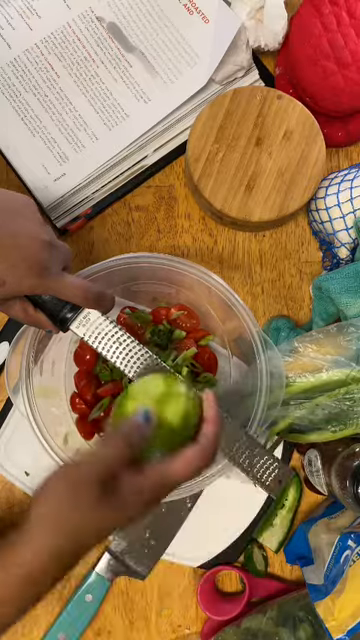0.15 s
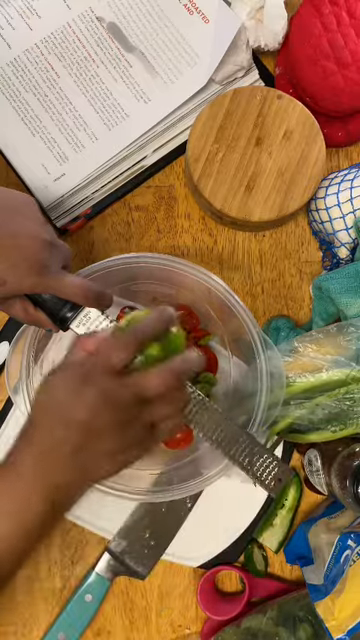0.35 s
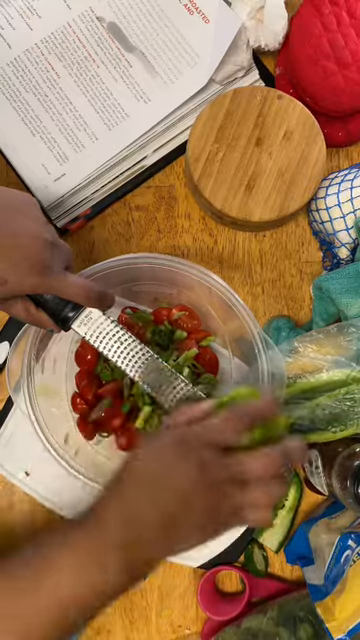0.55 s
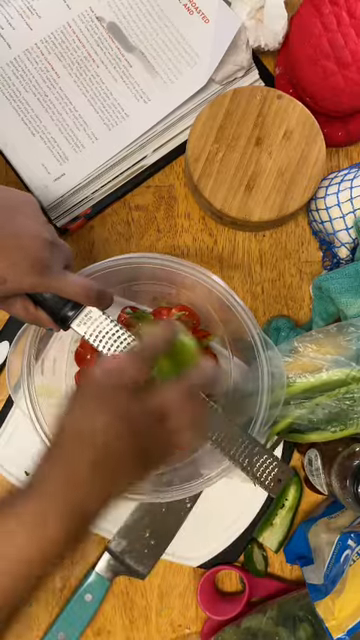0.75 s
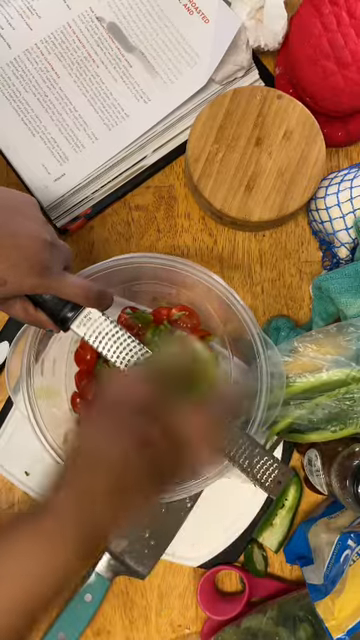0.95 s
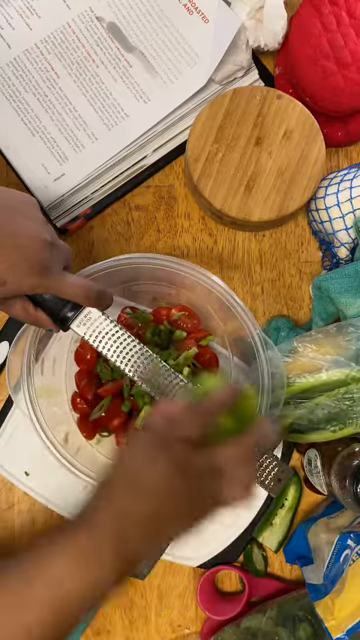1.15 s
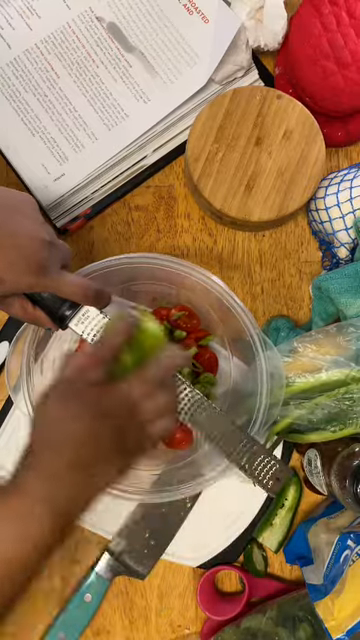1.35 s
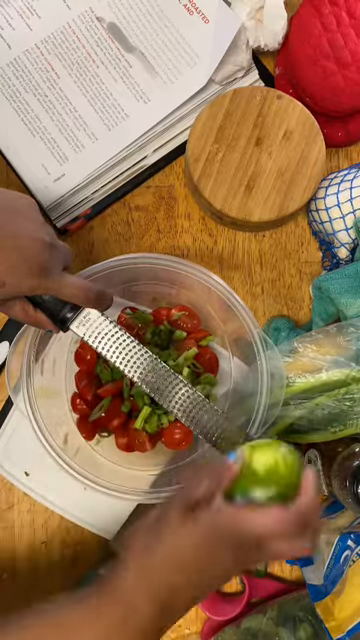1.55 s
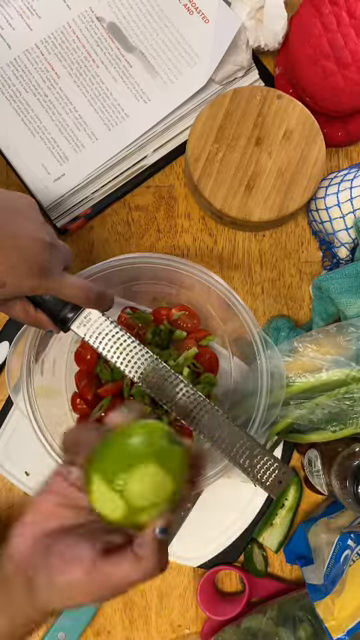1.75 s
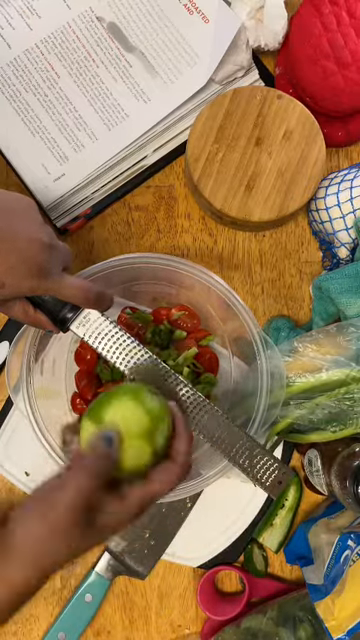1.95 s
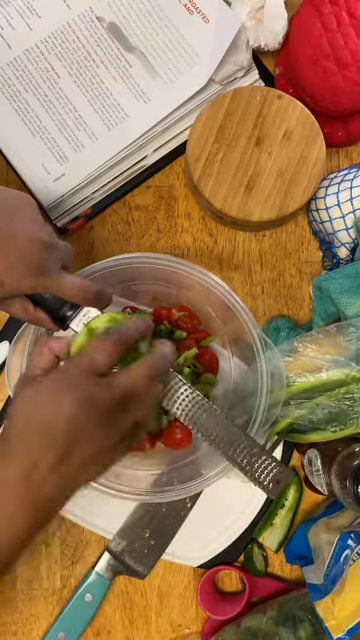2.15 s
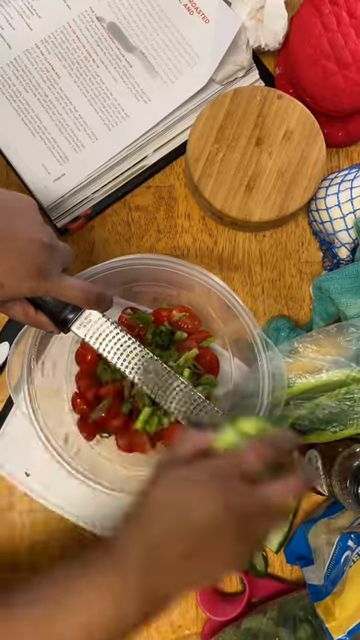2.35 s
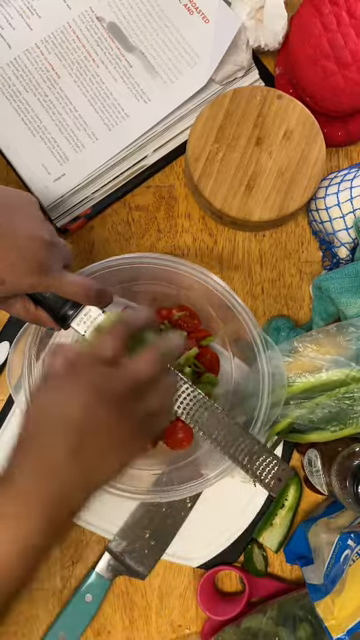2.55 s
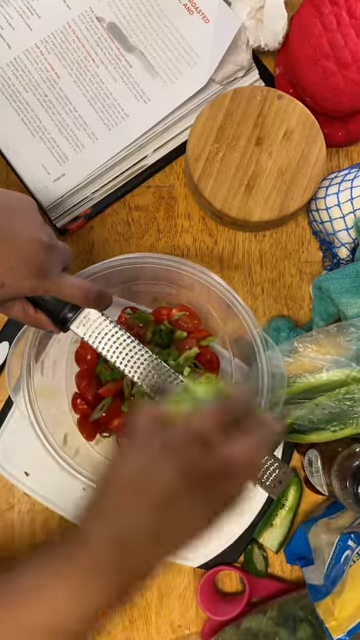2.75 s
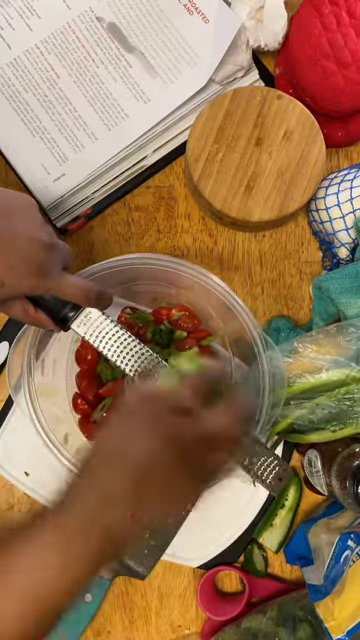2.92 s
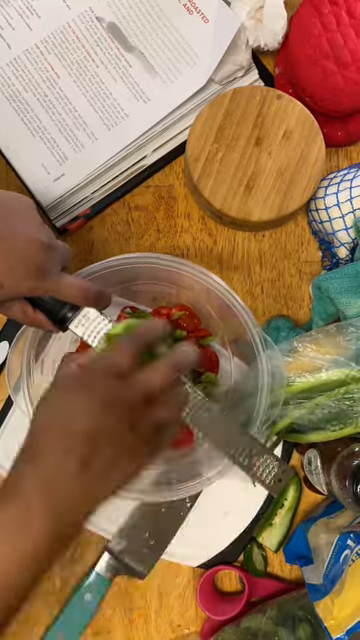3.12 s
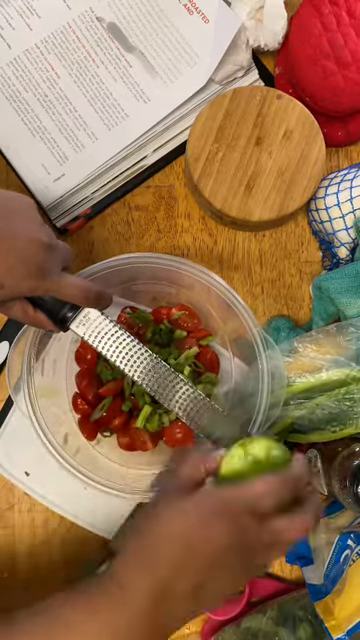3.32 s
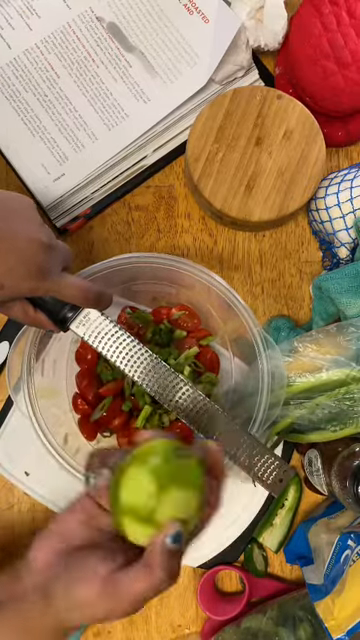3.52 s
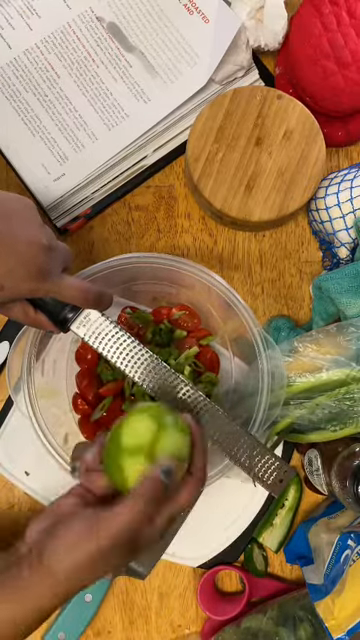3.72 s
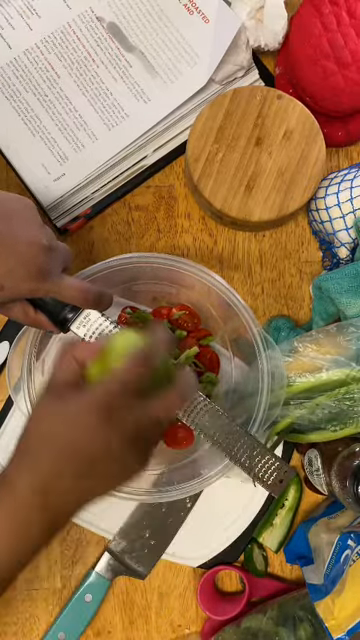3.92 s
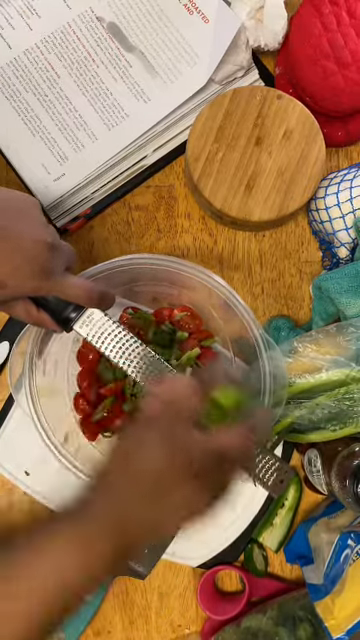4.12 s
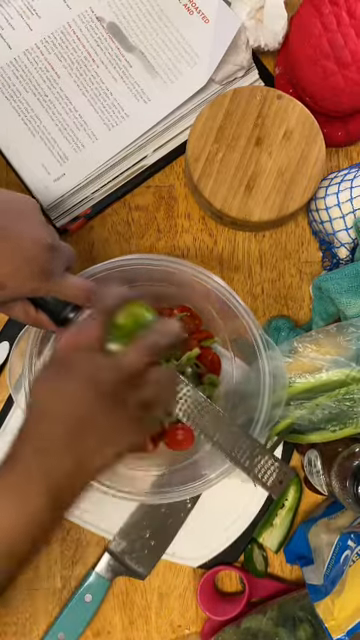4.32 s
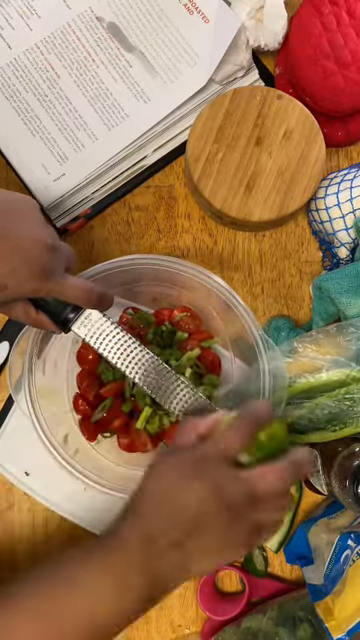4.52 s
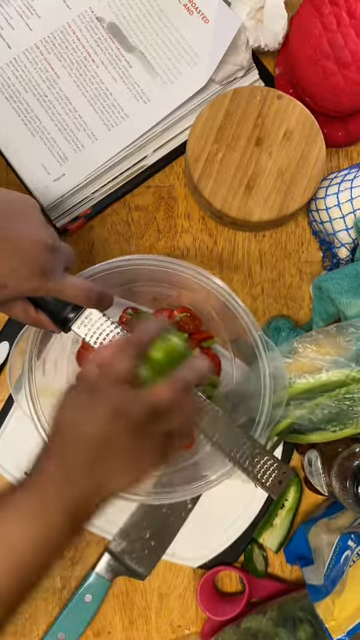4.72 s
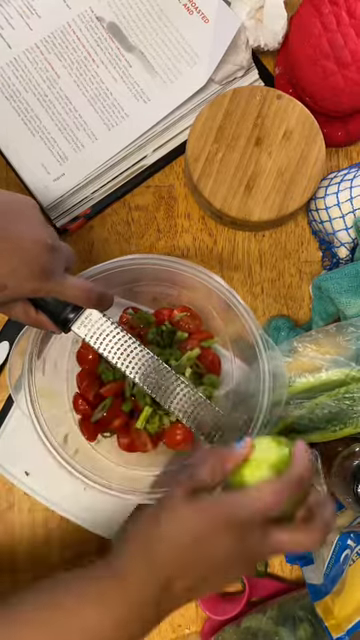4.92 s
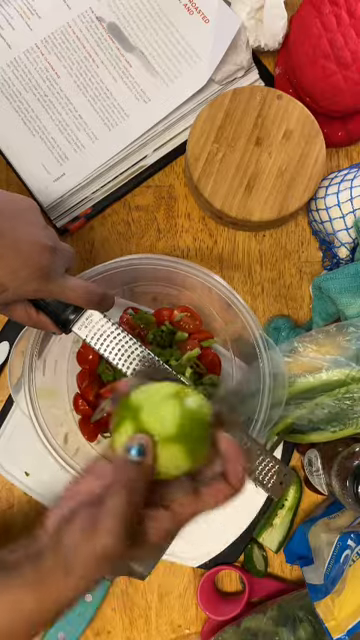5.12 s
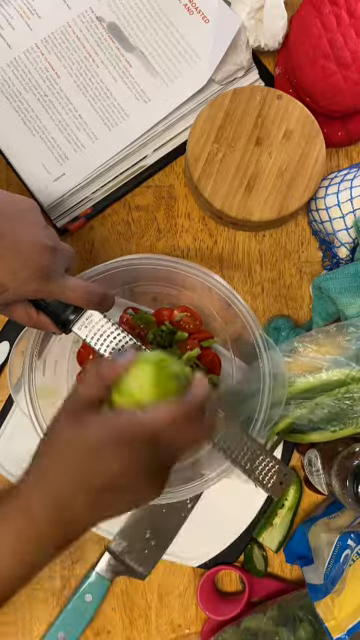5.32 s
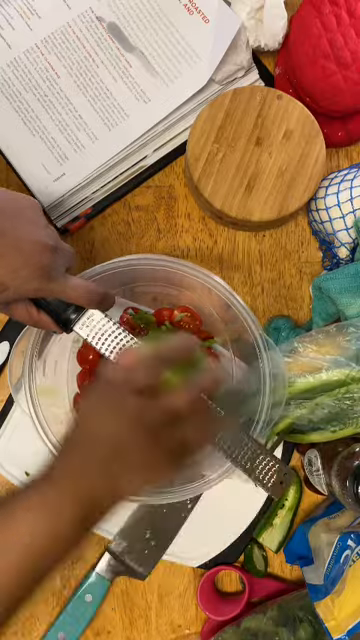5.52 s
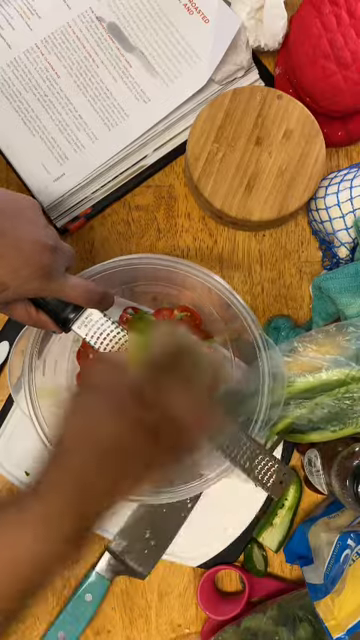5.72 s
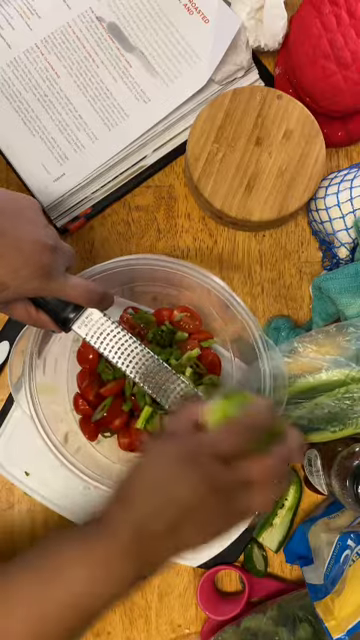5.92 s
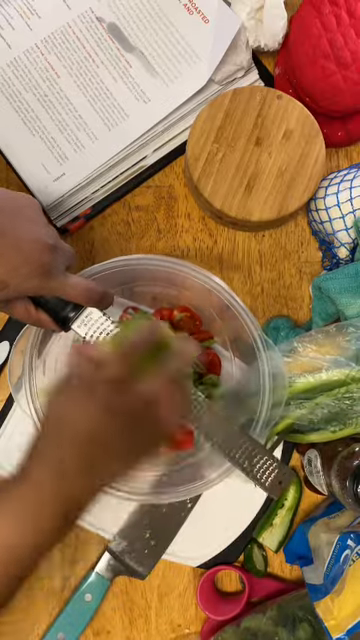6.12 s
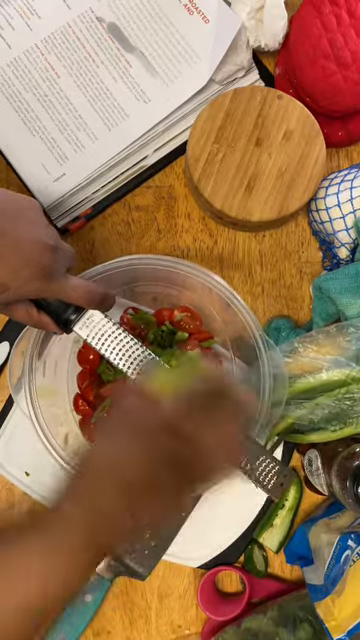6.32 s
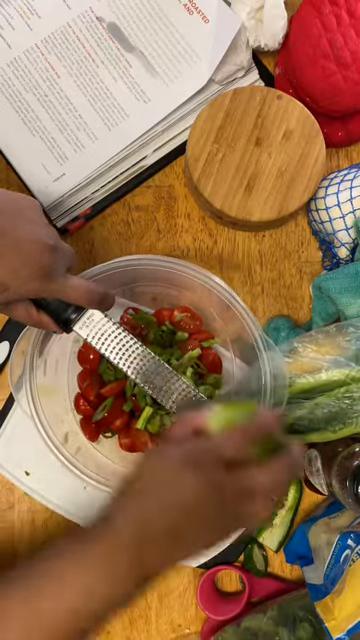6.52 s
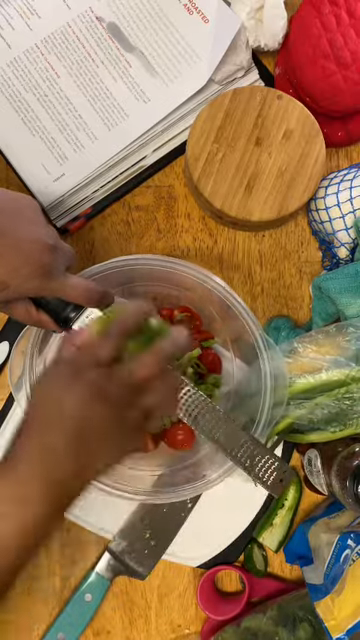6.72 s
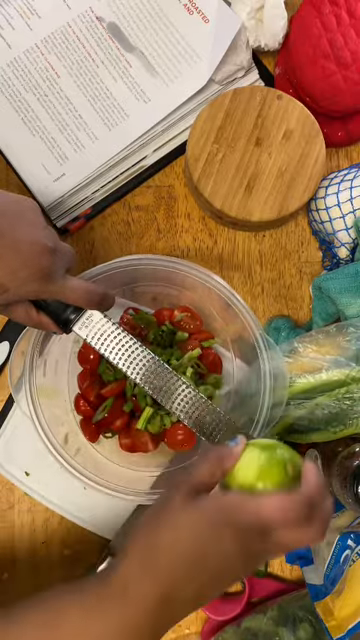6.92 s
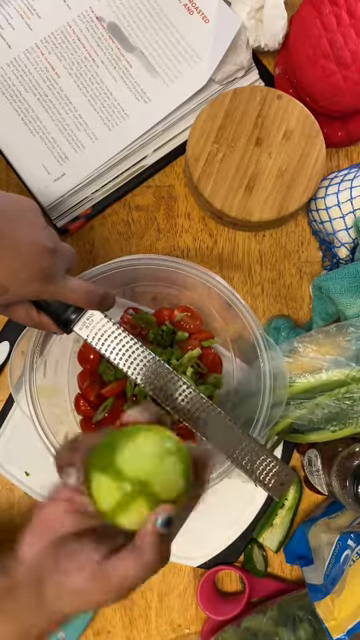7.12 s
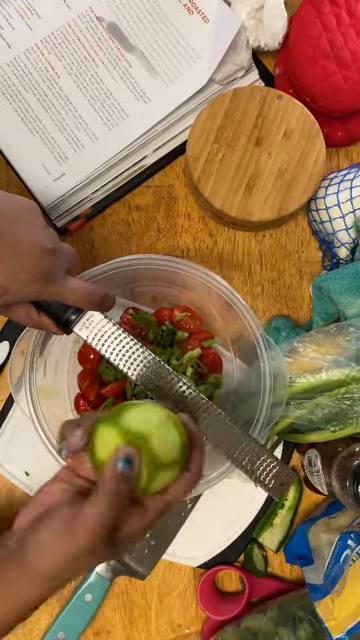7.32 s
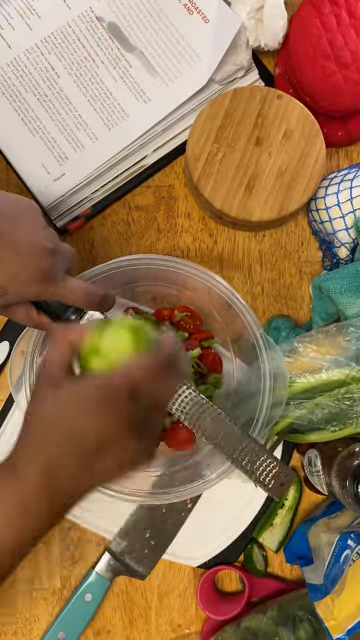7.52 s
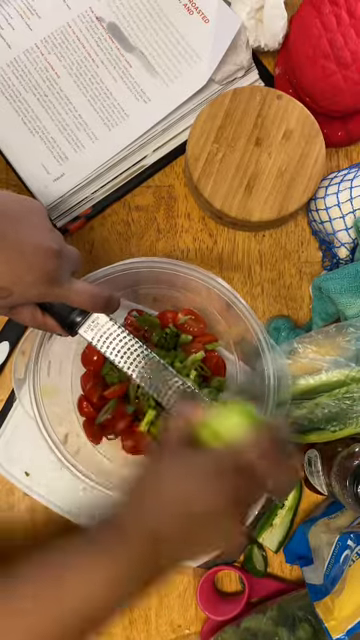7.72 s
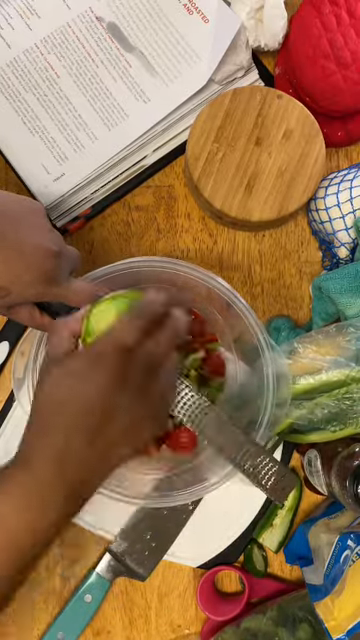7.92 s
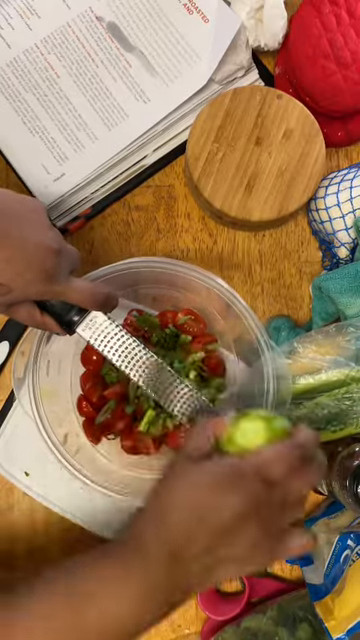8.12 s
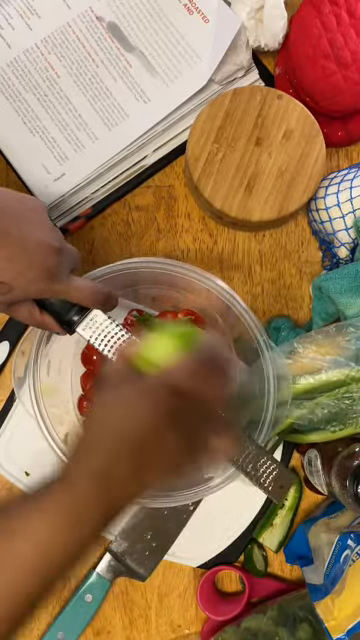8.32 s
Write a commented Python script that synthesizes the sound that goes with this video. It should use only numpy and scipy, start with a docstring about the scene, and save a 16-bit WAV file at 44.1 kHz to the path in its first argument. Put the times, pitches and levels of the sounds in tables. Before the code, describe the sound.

Short hissing grater strokes, each starting with a clacking tap and small thud, in uneven bursts over a low wavering kitchen fan drone.

```python
"""In a small kitchen an appliance hums and blows steadily: wavering tones over fan noise.
A lime is zested on a fine steel rasp that rests on the rim of a plastic bowl, on a wooden table.
At each landing the peel scuffs the blade, the rasp knocks and ticks on the rim (a crack and short modes),
the bowl rings faintly and the table thuds; then the teeth hiss through the peel as dense random snaps.
Dense echoes follow knocks and strokes; a close pair of microphones listens from above, with a little hiss."""
import sys
import numpy as np
from scipy import signal
from scipy.fft import rfft, irfft, next_fast_len
from scipy.io import wavfile

SR = 44100
rng = np.random.default_rng(int(sys.argv[2]) if len(sys.argv) > 2 else 0)


def pcm_store(signal):
    """Save signal as 16-bit PCM."""
    levels = np.round(np.clip(np.atleast_2d(signal), -1, 1) * 32767)
    wavfile.write(sys.argv[1], SR, levels.astype(np.int16).T)


N = 368235
TIME = np.arange(N) / SR

# the lime lands on the rasp, waits, then slides; levels are relative:
# landing_s, knock_db, blade_bending_db, wait_s, slide_s
LANDINGS = [(0.2567, -2.5, 0, 0.12, 0.081), (0.6418, -3.5, 2.5, 0.045, 0.12),
            (0.9703, -0.6, 1.8, 0.051, 0.12), (1.291, -5, 0.5, 0.053, 0.11), (2.101, -15.5, -6, .100, 0.11),
            (2.5037, 0.1, -4.5, 0.039, 0.095), (2.814, 0, -1.5, 0.027, 0.083),
            (3.0977, 1, -6, 0.042, 0.097), (3.9314, -6.5, -4.3, 0.087, 0.11), (4.295, -2, 2.5, .045, 0.11),
            (4.6406, 1.5, -2, 0.036, .130), (5.392, -7, -1, 0.082, 0.095), (5.749, -0.7, 1.5, .033, 0.1),
            (6.06, -4.5, 2, 0.041, 0.094), (6.3751, 1, 3, 0.023, 0.098), (6.6804, 2, -3.5, 0.048, 0.088),
            (7.5336, -6.5, -3, 0.063, 0.13), (7.908, 1.5, -2, 0.02, .120), (8.2345, -1, 3.5, 0.04, .120)]
# colour of the blade when scraped: frequency_hz, relative_density_db (per Hz)
BLADE_COLOUR = [(60, -110), (300, -78), (750, -67), (1150, -91), (1500, -72.5), (1900, -77), (2500, -90),
                (3100, -79.5), (4000, -105), (8000, -110)]
# likeness of left and right for close sounds: frequency_hz, correlation (-1 to 1)
CLOSE_STEREO = [(300, 1), (700, 0.17), (1500, 0.35), (2000, 1), (3000, 0.32), (5000, 0.58), (7000, 1)]
# the blade's main bending, and the pivot of the hardness tilt
BLADE_HZ = 1510


def from_db(db):
    """Decibels to gain."""
    return 10 ** (np.asarray(db) / 20)


def rms_one(x):
    """Scale to unit rms."""
    return x / np.sqrt(np.mean(x ** 2) + 1e-20)


def at_hz(points, hz):
    """Read a table on a log-frequency axis."""
    table_hz, values = np.array(points).T
    return np.interp(np.log(np.maximum(hz, 1)), np.log(table_hz), values)


def panned(db):
    """Left and right gains for a level difference; positive leans left."""
    return from_db(np.array([[db], [-db]]) / 2)


def add(out, s, sound):
    """Mix a sound in at a time in seconds."""
    i = max(round(s * SR), 0)
    out[..., i:i + sound.shape[-1]] += sound[..., :max(N - i, 0)]


def drift(rate_hz):
    """Slow random wander of unit rms: noise that falls away above the rate."""
    hz = np.fft.rfftfreq(N, 1 / SR)
    return rms_one(irfft(rfft(rng.standard_normal(N)) / (1 + (hz / rate_hz) ** 2), N))


def coloured(white, spectrum, likeness):
    """Two unrelated white signals become a stereo pair with a given density and likeness."""
    length = white.shape[1]
    size = next_fast_len(length)
    hz = np.fft.rfftfreq(size, 1 / SR)
    mid, side = rfft(white, size) * from_db(at_hz(spectrum, hz)) * np.sqrt(SR / 2)
    alike = np.clip(at_hz(likeness, hz), -1, 1)
    shared = np.sqrt((1 + alike) / 2) * mid
    opposed = np.sqrt((1 - alike) / 2) * side * [[1], [-1]]
    return irfft(shared + opposed, size)[:, :length]


def swell(t, peak_s):
    """A pulse that rises to 1 at its peak time and dies away exponentially."""
    return t / peak_s * np.exp(1 - t / peak_s)


def wavering_tone(hz, unsteadiness, rate_hz):
    """A unit-rms tone whose level and phase are shaken by slow random swings."""
    swing = 1 + unsteadiness * (drift(rate_hz) + 1j * drift(rate_hz))
    phase = 2 * np.pi * np.cumsum(hz * np.ones(N)) / SR
    return rms_one(np.real(swing * np.exp(1j * phase)))


def appliance(drone_hz=222.56, drone_db=-31.5, flutter=0.1, flutter_hz=6.3, waver_hz=2.8,
              swell_db=0.73, swell_hz=3.6, wander_hz=0.312, wander_rate_hz=0.34):
    """Motor and mains tones waver over the rush of a fan; the motor's speed wanders slowly."""
    # weaker tones: pitch_hz, level_db (rms), unsteadiness (random swing over steady part)
    hum_tones = [(120.4, -44, 0.33), (193.8, -44, 1.0), (350.3, -51.5, 0.8), (438.7, -57, 1),
                 (662, -54, 0.73)]
    # colour of the fan's rush: frequency_hz, density_db (per Hz)
    air_colour = [(15, -105), (35, -72), (60, -70.5), (90, -70.5), (130, -65), (200, -62.5), (300, -67),
                  (450, -65.5), (600, -70.5), (880, -67.5), (1100, -79), (1370, -77.5), (1600, -82.5),
                  (2200, -80), (3200, -85), (5200, -92.5)]
    # likeness of left and right in the rush: frequency_hz, correlation (-1 to 1)
    air_stereo = [(50, 0.92), (130, 1), (290, 1), (640, 0.25), (1400, 0.21), (3000, 0.13), (5000, 0.43),
                  (7000, 1)]
    motor = wavering_tone(drone_hz + wander_hz * drift(wander_rate_hz), flutter, flutter_hz)
    drone = from_db(drone_db + swell_db * drift(swell_hz)) * motor
    hum = sum(from_db(db) * wavering_tone(hz, unsteadiness, waver_hz)
              for hz, db, unsteadiness in hum_tones)
    rush = coloured(rng.standard_normal((2, N)), air_colour, air_stereo)
    rush = signal.sosfilt(signal.butter(6, 5800, fs=SR, output="sos"), rush)
    return panned(1.0) * (drone + hum) + rush


def touches(lead_s=0.0094, swell_s=0.0074, db=8.5):
    """The peel scuffs the blade a moment before it has pressed it onto the rim."""
    envelope, t = np.zeros(N), np.arange(SR // 20) / SR
    for s, _, bend_db, *_ in LANDINGS:
        add(envelope, s - lead_s, from_db(db + bend_db / 2) * swell(t, swell_s) ** 2)
    return coloured(envelope * rng.standard_normal((2, N)), BLADE_COLOUR, CLOSE_STEREO)


def hardness(bend_db, base=-0.17, per_bend=0.15):
    """Upward tilt of the modes in dB per octave: a landing that bends the blade more is also harder."""
    return base + per_bend * bend_db


def blade_share(hz, octaves=0.33):
    """How much a mode belongs to the blade's main bending, which depends on where the lime lands."""
    return np.exp(-(np.log2(hz / BLADE_HZ) / octaves) ** 2)


def knocks(damping=4.12, scatter_db=1.13, detune=0.015, crack_s=0.0014, crack_db=2.5,
           ring_db=-4.5, ring_delay_s=0.002972, ring_pan_db=11.5, left_lag_s=0.00002):
    """The rasp slaps the rim: a crack, modes that swell and are choked by the hands, a faint bowl ring."""
    # hand-damped modes of rasp and bowl: pitch_hz, relative_level_db, swell_s, left_over_right_db
    knock_modes = [(282, -20, 0.0018, 2.5), (789.5, -10.5, 0.0027, -9), (1245, -23, 0.0027, 11),
                   (1547, -12, 0.0021, 3), (2057, -12, 0.0019, 0), (2781, -14.5, 0.0012, 0),
                   (2973, -16, 0.0016, -9), (3970, -18.5, 0.0012, -2), (4644, -21, 0.00061, 0),
                   (5890, -26.5, 0.0016, 2), (7750, -44, 0.00026, -5), (9170, -32, 0.00033, 6)]
    # the bowl wall rings on: pitch_hz, relative_level_db, t60_s (time to fall 60 dB)
    bowl_modes = [(677, -35.5, 0.04), (725, -35, 0.26), (768, -33, 0.38), (820, -41, 0.25),
                  (1400, -27, 0.2), (1554, -31.5, 0.11), (2240, -34.5, 0.11), (2503, -41.5, 0.38)]
    # colour of the crack: frequency_hz, relative_density_db (per Hz)
    crack_colour = [(500, -93), (2000, -77), (5000, -65.5), (8000, -70.5), (12000, -80.5), (16000, -94)]
    out, t = np.zeros((2, N)), np.arange(SR // 4) / SR
    arrival = t - np.array([[left_lag_s], [0]])
    for s, level_db, bend_db, *_ in LANDINGS:
        crack = coloured(rng.standard_normal((2, len(t))), crack_colour, CLOSE_STEREO)
        knock = from_db(crack_db) * crack * swell(t, crack_s)
        for hz, db, swell_s, pan_db in knock_modes:
            # a higher damping power narrows the burst around its peak
            burst = (t / swell_s * np.exp(1 - np.minimum(t / swell_s, 20))) ** damping
            tilt_db = hardness(bend_db) * np.log2(hz / BLADE_HZ)
            bending_db = bend_db * blade_share(hz)
            gain = from_db(db + tilt_db + bending_db + scatter_db * rng.normal())
            pitch_hz = hz * (1 + detune * rng.normal())
            knock += gain * panned(pan_db) * burst * np.sin(2 * np.pi * pitch_hz * arrival)
        add(out, s, from_db(level_db) * knock)
        ring = np.zeros(len(t))
        for hz, db, t60_s in bowl_modes:
            decay = from_db(db + bend_db * blade_share(hz) / 2 - 60 * t / t60_s)
            ring += decay * np.sin(2 * np.pi * hz * t + rng.uniform(0, 2 * np.pi))
        add(out, s + ring_delay_s, from_db(level_db + ring_db) * panned(ring_pan_db) * ring)
    return out


def ticks(db=-18.5, lowest_hz=10000.0, delay_s=0.00099):
    """The steel edge meets the rim: one high-passed click in each knock, stronger when hard."""
    clicks = np.zeros(N)
    for s, level_db, bend_db, *_ in LANDINGS:
        add(clicks, s + delay_s, from_db([db + level_db + hardness(bend_db)]))
    return signal.sosfilt(signal.butter(2, lowest_hz, "high", fs=SR, output="sos"), clicks)


def thuds(hz=104.0, t60_s=0.046, push_s=0.0043, delay_s=0.0047, db=-15.5, lowest_hz=62.0,
          follows_knock=0.4, loss_db_per_s=160.0):
    """The hand's weight softly pushes and rocks bowl and table, too small to radiate deep bass."""
    out, t = np.zeros(N), np.arange(SR // 4) / SR
    push = np.sin(np.pi * np.minimum(t / push_s, 1)) ** 2
    thud = signal.fftconvolve(push, from_db(-60 * t / t60_s) * np.sin(2 * np.pi * hz * t))
    thud = signal.sosfilt(signal.butter(2, lowest_hz, "high", fs=SR, output="sos"), thud)
    thud = thud / np.abs(thud).max()
    for s, level_db, _, wait_s, _ in LANDINGS:
        # a hurried stroke lands with the weight of the hand; a careful one waits and thuds less
        weight_db = follows_knock * level_db - loss_db_per_s * wait_s
        add(out, s + delay_s, from_db(db + weight_db) * thud)
    return out


def tooth_cuts(contact, per_s=14000.0, spread_db=1.0):
    """Tiny snaps of peel cells, more of them the more teeth are in contact."""
    sizes = from_db(spread_db * np.minimum(rng.exponential(1, (2, N)), 5))
    snaps = rms_one(sizes * rng.choice([-1, 1], (2, N)))
    share = min(per_s / SR, 1)  # chance of a snap per sample at full contact
    return snaps * (rng.random((2, N)) < share * contact) / np.sqrt(share)


def grating(bite_s=0.0089, release_s=0.018, bite_db_per_s=27, slide_swell_db=1.6,
            judder_db=1.33, judder_hz=70.0, teeth_db=0.5, blade_db=-1.5):
    """The peel bites in, slides and lifts off; cuts hiss and further cuts sound through the blade."""
    # colour of the cutting teeth: frequency_hz, relative_density_db (per Hz)
    teeth_colour = [(500, -85), (1500, -81.5), (3000, -83), (3800, -83.5), (5200, -81), (6000, -83.5),
                    (7600, -81), (8700, -83), (10000, -84.5), (11500, -89.5), (13000, -87), (15700, -97)]
    contact, force = np.zeros((2, N))
    for s, _, _, wait_s, slide_s in LANDINGS:
        t = TIME - s - wait_s
        bite = (1 + np.tanh(t / bite_s / 2)) / 2
        release = (1 + np.tanh((slide_s - t) / release_s / 2)) / 2
        touch = bite * release
        # the longer the lime settles, the deeper the teeth bite; the push grows along the slide
        push_db = bite_db_per_s * wait_s + slide_swell_db * (np.clip(t / slide_s, 0, 1) - 0.5)
        contact = contact + touch
        force = force + np.sqrt(touch) * from_db(push_db)
    # the dimpled peel catches unevenly on the rows of teeth
    pressure = from_db(judder_db * drift(judder_hz)) * force
    hiss = coloured(tooth_cuts(contact) * pressure, teeth_colour, CLOSE_STEREO)
    body = coloured(tooth_cuts(contact) * pressure, BLADE_COLOUR, CLOSE_STEREO)
    return from_db(teeth_db) * hiss + from_db(blade_db) * body


def kitchen(x, gap_s=0.0024, early_db=5.0, early_s=0.032):
    """Dense echoes: strong early ones from table and cupboards, then a tail that dies by band."""
    # colour of the echoes: frequency_hz, relative_level_db
    echo_colour = [(50, -27), (120, 13.5), (300, -5), (600, 2.5), (800, -5), (1100, -4.5), (1400, -5),
                   (1900, -11.5), (2400, -2), (3000, -9), (5000, -6), (12000, -14)]
    # length of the tail: band_hz, t60_s (time to fall 60 dB, before the early boost)
    tail_times = [(150, 0.38), (800, 0.34), (2500, 0.23), (12000, 0.28)]
    t = np.arange(SR // 2) / SR
    noise = coloured(rng.standard_normal((2, len(t))), echo_colour, CLOSE_STEREO) / np.sqrt(SR / 2)
    spectrum, hz, echoes = rfft(noise), np.fft.rfftfreq(len(t), 1 / SR), 0
    # silent for half the gap, then faded in by its end
    onset = np.clip(2 * t / gap_s - 1, 0, 1)
    for band_hz, t60_s in tail_times:
        # neighbouring bands crossfade
        share = at_hz([(f, f == band_hz) for f, _ in tail_times], hz)
        decay = from_db(early_db * np.exp(-t / early_s) - 60 * t / t60_s) * onset
        echoes = echoes + irfft(spectrum * share, len(t)) * decay / np.sqrt(np.sum(decay ** 2))
    return signal.fftconvolve(x.mean(axis=0)[None], echoes, axes=1)[:, :N]


def scene(knock_room_db=0.0, grating_room_db=-3.5):
    """Knocks and strokes with kitchen echoes, dry thuds, and the appliance throughout."""
    hum_and_rush = appliance()
    hits = touches() + knocks() + ticks()
    strokes = grating()
    room = kitchen(from_db(knock_room_db) * hits + from_db(grating_room_db) * strokes)
    return hum_and_rush + hits + thuds() + strokes + room


def record(dry, peak=0.92, lowest_hz=32, highest_hz=15900):
    """Microphone hiss, a treble that spreads wide, rounded peaks, a cut bottom and top."""
    # colour of the microphone hiss: frequency_hz, density_db (per Hz)
    hiss_colour = [(2000, -110), (6000, -99), (8000, -105), (11000, -105), (13000, -114), (16000, -118)]
    # the treble turns in phase between the channels: frequency_hz, left_lead_half_turns
    treble_turn = [(0, 0), (5200, .05), (6000, .45), (7250, 1), (10300, 2), (13600, 3), (15700, 4)]
    x = dry + coloured(rng.standard_normal((2, N)), hiss_colour, CLOSE_STEREO)
    size = next_fast_len(N + SR // 10)
    turn = np.pi * np.interp(np.fft.rfftfreq(size, 1 / SR), *np.transpose(treble_turn))
    # each channel takes half the turn, in opposite directions
    x = irfft(rfft(x, size) * np.exp(0.5j * turn * [[1], [-1]]), size)[:, :N]
    x = x / (1 + (x / peak) ** 4) ** 0.25
    x = signal.sosfilt(signal.butter(3, lowest_hz, "high", fs=SR, output="sos"), x)
    return signal.sosfilt(signal.ellip(10, 0.1, 80, highest_hz, fs=SR, output="sos"), x)


dry = scene()
out = record(dry)
pcm_store(out)
```